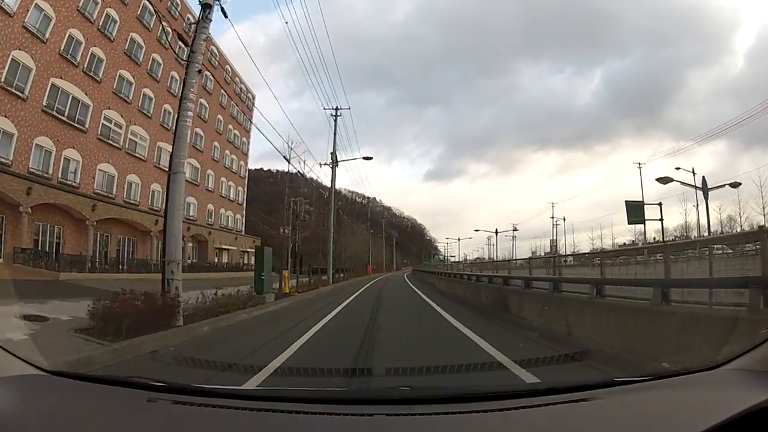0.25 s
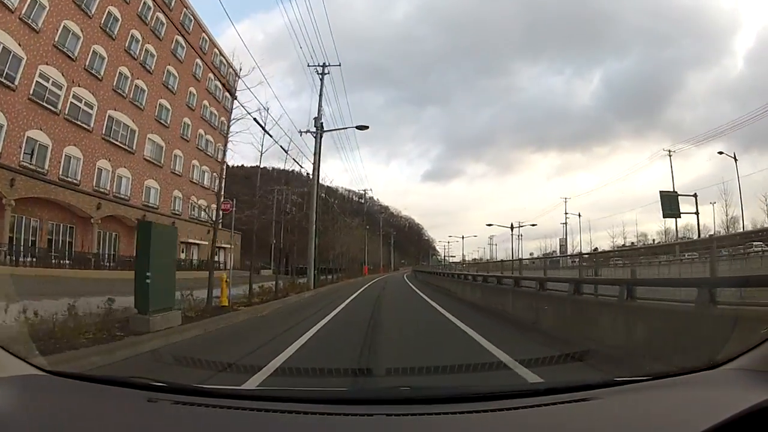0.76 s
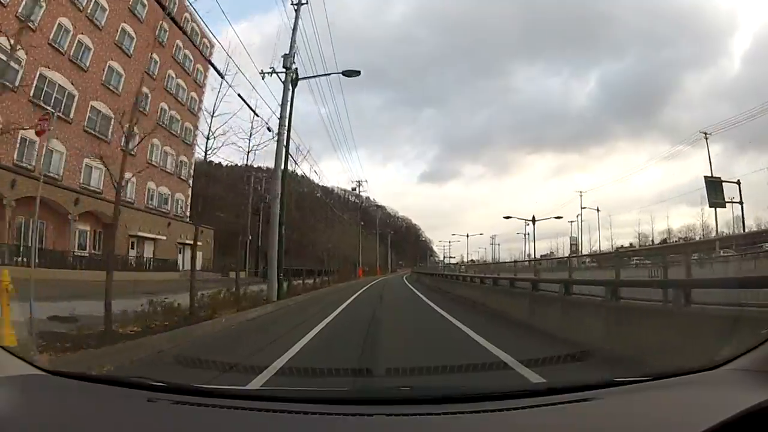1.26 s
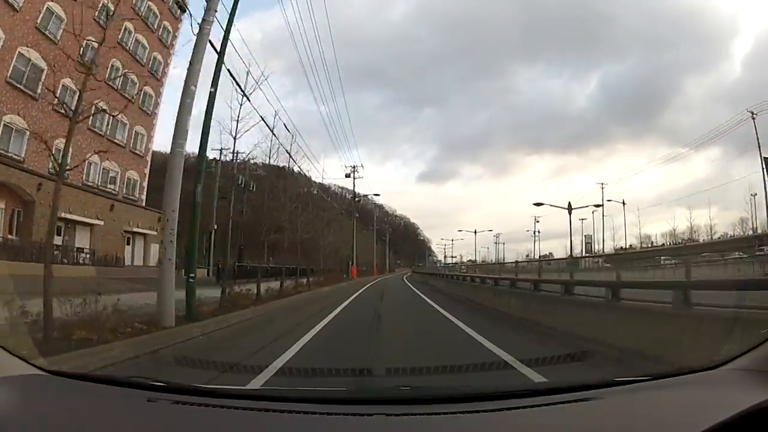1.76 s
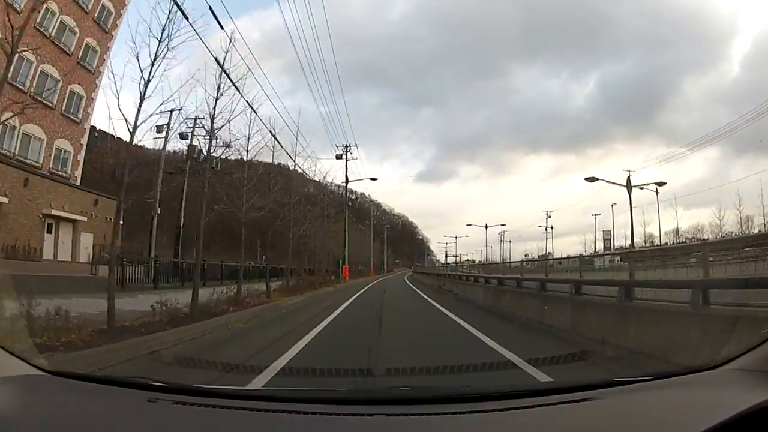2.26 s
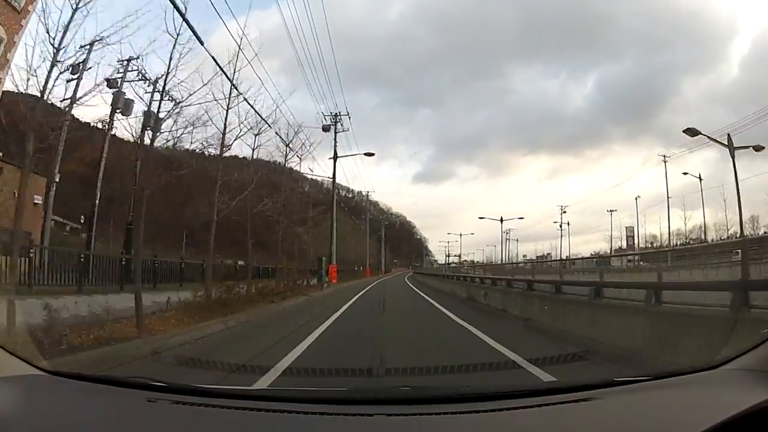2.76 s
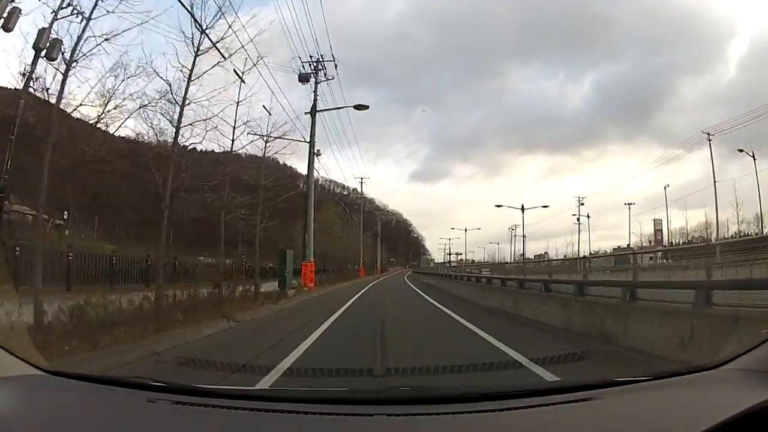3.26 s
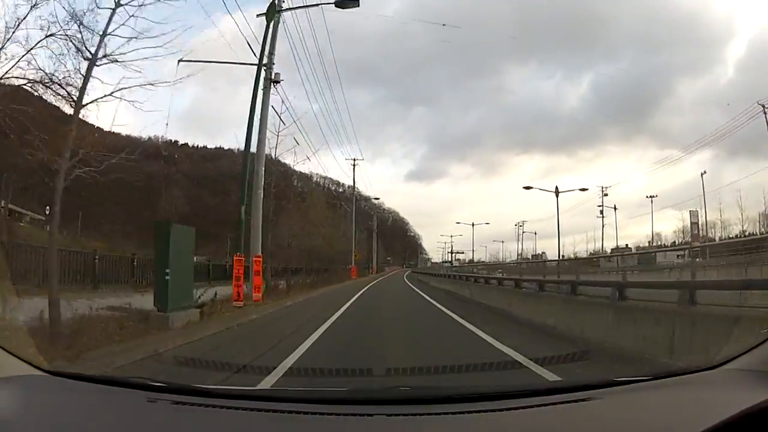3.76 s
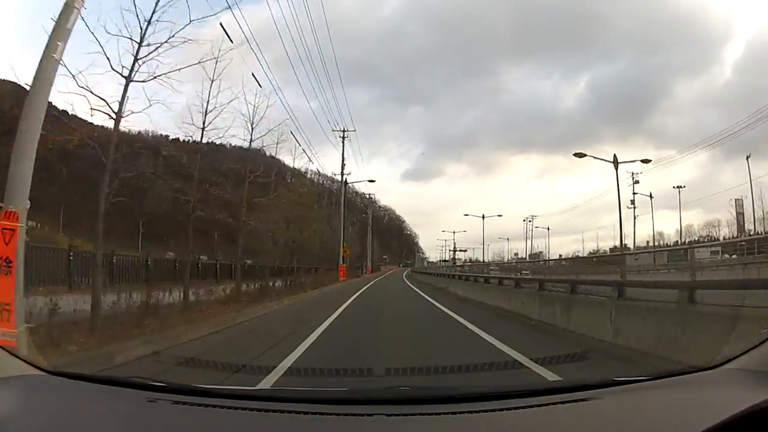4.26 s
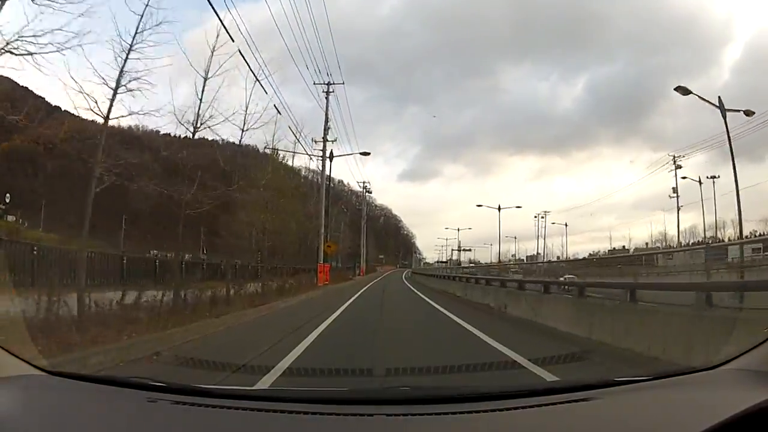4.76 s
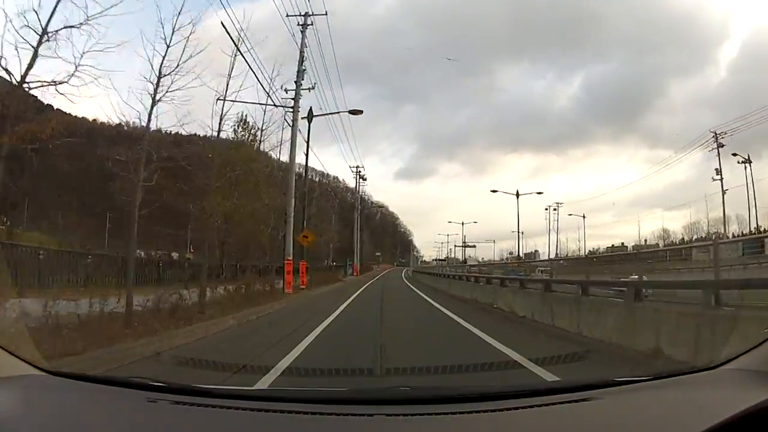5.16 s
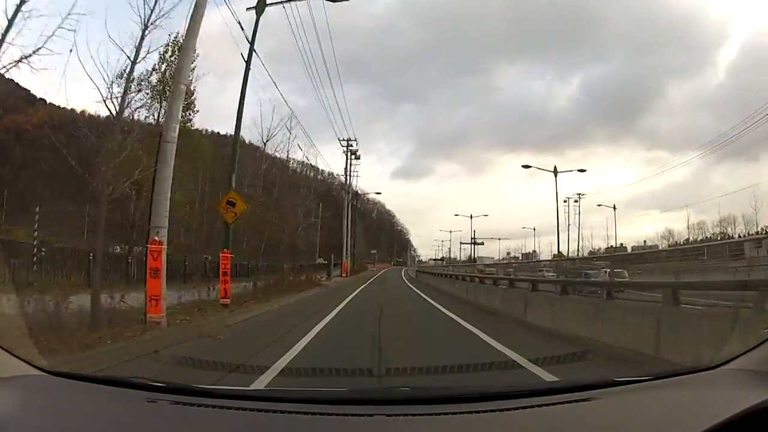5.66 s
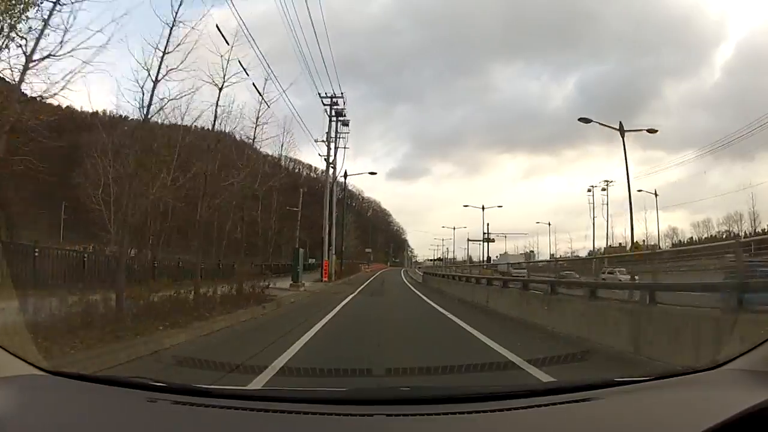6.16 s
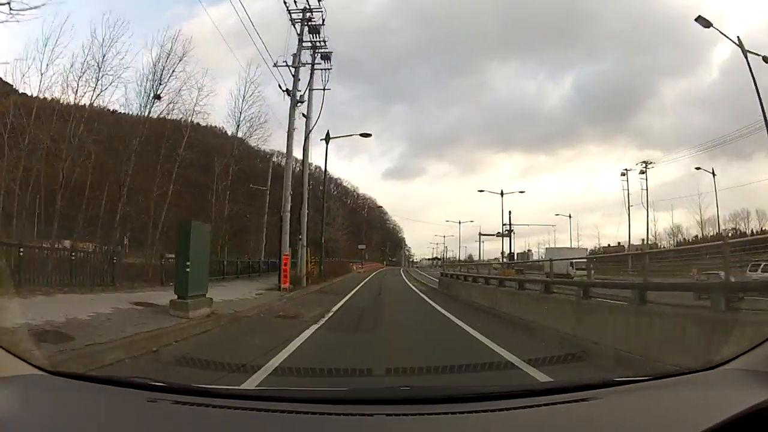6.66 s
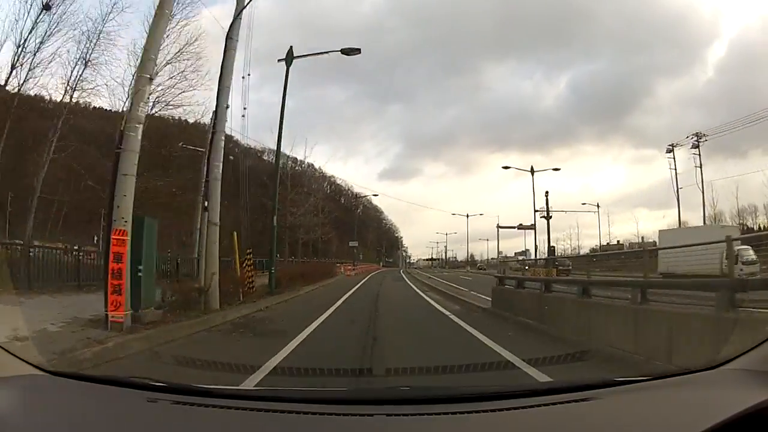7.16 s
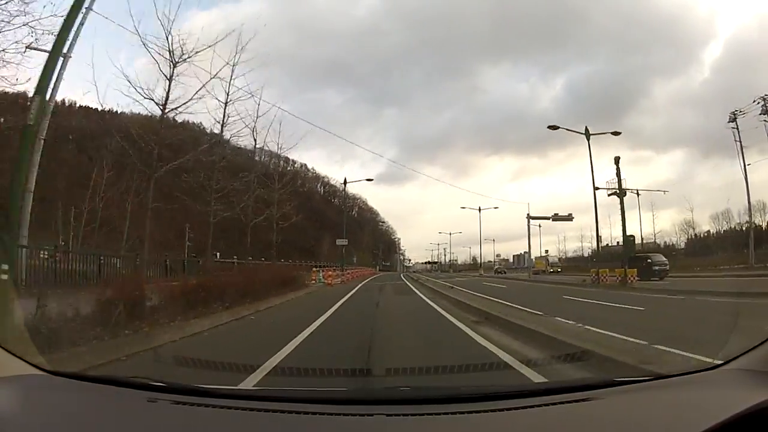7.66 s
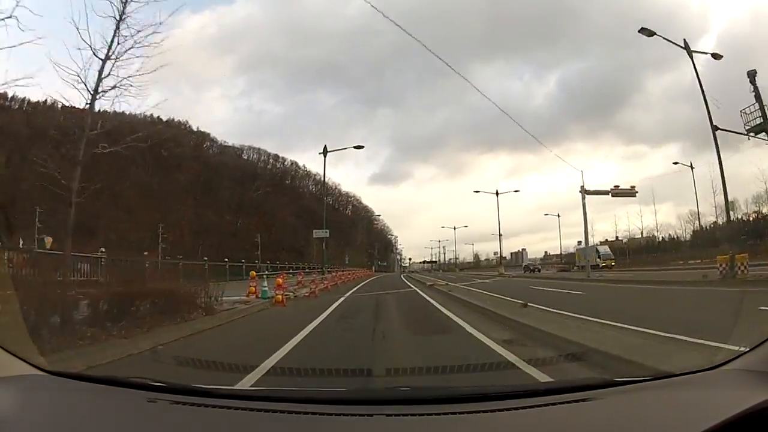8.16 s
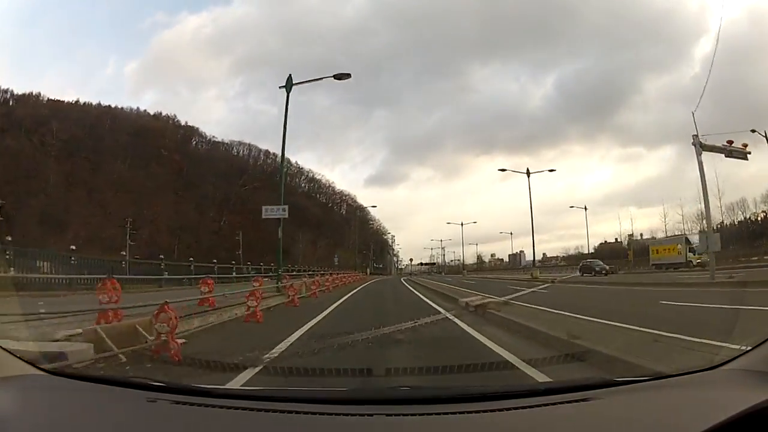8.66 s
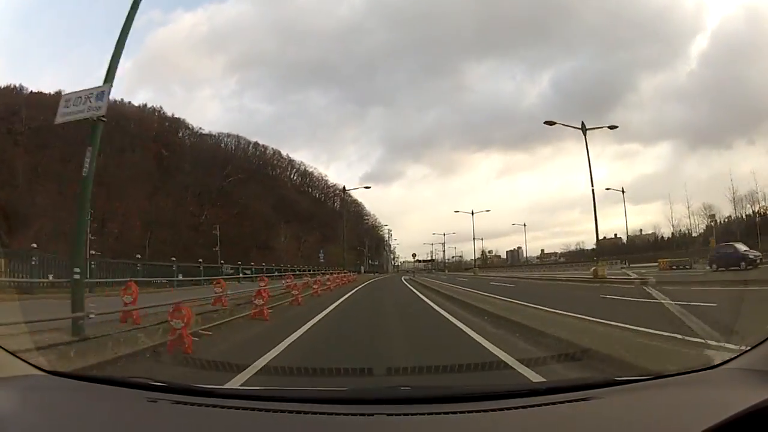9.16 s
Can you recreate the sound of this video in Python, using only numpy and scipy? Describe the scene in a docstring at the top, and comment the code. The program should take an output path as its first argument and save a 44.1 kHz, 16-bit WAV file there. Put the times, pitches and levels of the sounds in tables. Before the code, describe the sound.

Car cabin hum: a four-cylinder engine rises and settles to a drone, tyres rumble, and late rough asphalt brings thumps and plastic rattling.

```python
"""A four-cylinder engine, sines locked to its firing phase, climbs in pitch and eases into a drone inside a hybrid car.
Tyres rumble through the body as shaped noise; two damped modes boom over bumps.
Dashboard trim rattles in fits of noise fed by dense contacts, most of them on a rough stretch late on.
The dash camera's rippling sample timing adds a thin whine near 12 kHz that follows the sound."""
import sys
import numpy as np
from scipy import signal
from scipy.fft import rfft, irfft, next_fast_len
from scipy.io import wavfile
from scipy.ndimage import uniform_filter1d, map_coordinates

SR = 44100
rng = np.random.default_rng(int(sys.argv[2]) if len(sys.argv) > 2 else 0)


def unload_wav(signal):
    """Save mono or channel-first audio to the path in sys.argv[1] as 16-bit WAV at rate SR, clipped to [-1, 1]."""
    wavfile.write(
        sys.argv[1],
        SR,
        np.round(np.clip(np.atleast_2d(signal).T, -1, 1) * 32767).astype(np.int16),
    )


N = 414981

# engine speed before waver: time_s, firing_hz
FIRING_CURVE = [(0, 103.2), (.3, 101.3), (.75, 104.5), (1.25, 111.7), (1.5, 112.6), (2.03, 113.4),
                (2.55, 117.3), (3.2, 120.9), (4.0, 122.2), (4.4, 125), (4.85, 126.2), (5.5, 123.5),
                (6.6, 118), (7.2, 120.8), (7.72, 122), (8.1, 116.7), (8.6, 115.9), (9.41, 115)]
# how hard the engine pulls: time_s, load_db
LOAD_CURVE = [(0, -3), (.8, -4.5), (1.9, -1), (3.3, -2.25), (4.7, 1.1), (6.3, 0.17), (7.6, 0.5),
              (8.1, -0.9), (9.41, -1.5)]
# cabin response to firing harmonics 1 to 4, before load and waver; a list each: line_hz, level_db
CABIN_RESPONSES = [
    [(103, -25.5), (113, -27), (116, -33), (119, -31), (122, -27.5), (126, -24.5)],
    [(205, -33), (210, -30), (216, -19.5), (226, -23), (237, -24), (244, -25.5), (252, -28)],
    [(309, -27), (315, -29), (324, -23.5), (335, -37), (340, -46.5), (345, -30.5), (365, -27), (372, -24.5),
     (378, -23.5)],
    [(416, -33), (436, -36), (453, -49), (468, -40), (504, -37.5)],
]
# load followed by each of those harmonics: share [dB per dB]
HARMONIC_LOAD_SHARES = [.1, 0.31, 1.4, .3]
# weak lines from unequal cylinders, before load, waver and panels: firing_multiple, level_db
GROWL_LINES = [(0.749, -43.5), (1.25, -38), (1.75, -41), (2.25, -40.5), (2.5, -38.5), (2.75, -41.5),
               (3.25, -41.5), (3.5, -44.5), (3.75, -45), (4.25, -47), (4.5, -53), (4.75, -53), (5.0, -52),
               (5.25, -52.5), (5.5, -70), (5.75, -54.5), (6.0, -62.5), (6.25, -58), (6.5, -70), (6.75, -62),
               (7.0, -62.5), (7.25, -66.5), (7.75, -63.5), (8.0, -62.5), (8.25, -66)]
# cabin panels lifting lines that pass through: centre_hz, half_width_hz, lift_db
PANEL_RESONANCES = [(342.8, 5.5, 10), (379.3, 9.8, 8.5), (432.6, 16, 7.5), (565, 11, 7.5),
                    (672, 17.6, 16.5), (769.3, 16, 14.5)]
# faint high engine lines, before load and scatter: line_hz, level_db
BUZZ_LEVELS = [(1000, -65), (1250, -84), (1600, -82.5), (1950, -73.5), (2400, -77), (3000, -77),
               (3600, -90.5)]
# engine hiss spectrum, relative: frequency_hz, density_db
HISS_SPECTRUM = [(700, -31), (1100, -4.5), (1600, -3), (1900, 0.5), (2400, -5.5), (2900, -5), (3300, -8.5),
                 (4000, -10.5), (4600, -21), (6000, -34), (8000, -20.5), (15000, -28)]
# road-shaken body spectrum, relative: frequency_hz, density_db
BOOM_SPECTRUM = [(8, -31), (17, -16), (25, 4.5), (46, 3), (62, 1), (75, -10.5), (180, -120)]
# tyre spectrum, relative: frequency_hz, density_db
RUMBLE_SPECTRUM = [(55, -21.5), (76, -5), (88, 1), (101, 0.5), (120, -2), (144, -1.5), (173, -8.5),
                   (210, -3.5), (260, -5.5), (300, -17.5), (700, -120)]
# tread spectrum, relative: frequency_hz, density_db
ROAR_SPECTRUM = [(200, -48.5), (285, 1), (340, 0), (420, -6), (500, -7), (590, -5), (635, -12.5), (668, -6),
                 (700, -8.5), (820, -20), (920, -20), (1150, -33), (2600, -120)]
# trim spectrum, relative: frequency_hz, density_db
RATTLE_SPECTRUM = [(800, -26), (1400, 3.5), (2800, 0.5), (4000, -1.5), (5000, -7.5), (6000, -16),
                   (7500, -15), (12000, -29.5)]
# asphalt coarseness: time_s, coarseness_db
SURFACE_CURVE = [(0, -1.5), (1.0, -1), (1.8, 0.5), (2.6, -1.5), (4.0, -0.5), (5.85, -0.5), (6.3, 2.5),
                 (7.0, 0), (7.4, 6.5), (8.05, 0.5), (8.45, .5), (8.75, 7.5), (9.41, 9.5)]
# level laws: start_db (before the surface), rise_db_per_s, surface_share [dB per dB]
HISS_LEVEL_LAW = (-57.5, 0.46, 0.26)
BOOM_LEVEL_LAW = (-26.5, .05, 1.1)
RUMBLE_LEVEL_LAW = (-27.5, 0.12, 1.0)
ROAR_LEVEL_LAW = (-36, 0.61, 0.45)
# chatter fits in loose trim: start_s, hold_s (from the start, attack included), level_db
CHATTER_FITS = [(0, .24, -59), (1.165, 0.22, -69), (7.354, 0.11, -68.5), (7.862, .1, -65),
                (8.15, .02, -64.5), (8.673, .06, -64.5), (8.936, 0.33, -60), (9.233, 0.19, -54.5)]
# dashboard ticks, before TICK_TRIM_DB: start_s, level_db
TICK_EVENTS = [(1.179, -54), (2.61, -51), (3.21, -50.5), (8.18, -47.5), (8.988, -42.5), (9.048, -37),
               (9.255, -42), (9.262, -37), (9.295, -40.5), (9.308, -46.5), (9.362, -39.5)]
# road bumps, before BUMP_TRIM_DB: start_s, body_boom_db, cabin_air_db
BUMP_EVENTS = [(0.002, -15, -17.5), (6.062, -22.5, -18), (6.15, -16, -23), (7.11, -27, -13.5),
               (7.301, -19, -13), (7.434, -25.5, -20.5), (7.496, -13.5, -29), (7.821, -26, -17),
               (8.708, -15, -16.5), (8.823, -24.5, -12), (8.99, -20, -23), (9.165, -16, -16),
               (9.248, -12.5, -22)]
# modes a bump rings, body boom then cabin air, before detuning: mode_hz, t60_s
BUMP_MODES = [(37, 0.69), (138, 0.27)]

JOSTLE_DB_PER_DB = 0.16  # extra line waver per dB of coarse asphalt
CHATTER_ATTACK_S, CHATTER_RELEASE_S = 0.0067, 0.11
CONTACTS_PER_S, CONTACT_T60_S = 2000, 0.012
TICK_TRIM_DB, BUMP_TRIM_DB = -7.5, 4.5
RIPPLE_HZ, RIPPLE_DB, SLOPE_TOP_HZ, TOP_HZ = 12000, 7.0, 5500, 15290


def amp(db):
    """Decibels to gain."""
    return 10 ** (np.asarray(db) / 20)


def unit(x):
    """Scale to rms 1."""
    return x / np.sqrt(np.mean(x ** 2) + 1e-20)


def along(points, hz):
    """Read (Hz, value) points on a log axis."""
    point_hz, values = np.transpose(points)
    return np.interp(np.log(hz + 1), np.log(point_hz), values)


def curves(rows):
    """One value per sample for each column after the time."""
    time_s, *columns = np.transpose(rows)
    return [np.interp(np.arange(N) / SR, time_s, column) for column in columns]


def wobble(knots_per_s):
    """Smooth random curve."""
    knots = rng.standard_normal(1024)
    positions = np.linspace(0, knots_per_s * N / SR, 4096)
    coarse = map_coordinates(knots, [positions], mode="wrap")
    return np.interp(np.linspace(0, 1, N), np.linspace(0, 1, len(coarse)), coarse)


def filtered(x, response):
    """Apply a response of frequency."""
    size = next_fast_len(N + SR // 4, True)
    spectrum = rfft(x, size) * response(np.fft.rfftfreq(size, 1 / SR))
    return irfft(spectrum, size)[:N]


def coloured(x, spectrum):
    """Shape x by a spectrum, at rms 1."""
    return unit(filtered(x, lambda hz: amp(along(spectrum, hz))))


def noise(spectrum):
    """Coloured noise of rms 1."""
    return coloured(rng.standard_normal(N), spectrum)


def even(x, window_s):
    """Divide noise by its local rms to smooth away slow chance swells."""
    size = int(window_s * SR)
    power = uniform_filter1d(uniform_filter1d(x * x, size), size)
    return x / np.sqrt(np.abs(power) + 1e-9)


def line(phase, multiple):
    """Sine of rms 1 locked to the firing phase (in cycles)."""
    turns = (multiple * phase + rng.random()) % 1
    return np.sqrt(2) * np.sin((2 * np.pi * turns).astype(np.float32))


def road_db(law):
    """Noise level growing with the car's speed (as a steady rise in time) and asphalt coarseness."""
    start_db, rise_db_per_s, surface_share = law
    surface_db, = curves(SURFACE_CURVE)
    return start_db + rise_db_per_s * np.arange(N) / SR + surface_share * surface_db


def drone(phase, firing_hz, load_db, waver_db):
    """Strong firing harmonics swell and fade as they sweep through the cabin's modes."""
    surface_db, = curves(SURFACE_CURVE)
    unsteady_db = waver_db + JOSTLE_DB_PER_DB * np.maximum(surface_db, 0)
    out = np.zeros(N)
    for k, (response, share) in enumerate(zip(CABIN_RESPONSES, HARMONIC_LOAD_SHARES), 1):
        level_db = along(response, k * firing_hz) + share * load_db + unsteady_db * wobble(7)
        out += amp(level_db) * line(phase, k)
    return out


def growl(phase, firing_hz, waver_db):
    """Weaker lines swell as they cross panel resonances."""
    grid_hz = np.arange(SR // 32)
    lift_db = sum(db / (1 + ((grid_hz - hz) / half_width_hz) ** 2)
                  for hz, half_width_hz, db in PANEL_RESONANCES)
    out = np.zeros(N)
    for k, db in GROWL_LINES:
        lift = np.interp(k * firing_hz, grid_hz, amp(lift_db))
        out += amp(db + waver_db * wobble(4)) * lift * line(phase, k)
    return out


def buzz(phase, firing_hz, scatter_db):
    """High multiples of the engine cycle, which lasts four firings."""
    multiples = np.arange(37, 112) / 4
    speeds_hz = np.linspace(firing_hz.min(), firing_hz.max(), num=8)
    out = np.zeros(N)
    for k in multiples:
        # crowded cabin modes: a new strength at each speed
        level_db = along(BUZZ_LEVELS, k * speeds_hz) + scatter_db * rng.standard_normal(len(speeds_hz))
        out += np.interp(firing_hz, speeds_hz, amp(level_db)) * line(phase, k)
    return out


def engine_hiss(phase, load_db):
    """Valves and injectors pulse noise near the firing rate and at 1/4 and 3/4 of it."""
    per_cycle = 1 / 4
    pulses = 1 + 0.076 * line(phase, 0.96)
    pulses += 0.1 * line(phase, per_cycle)
    pulses += 0.08 * line(phase, 1 - per_cycle)
    level = amp(road_db(HISS_LEVEL_LAW) + 0.25 * load_db)
    return level * unit(pulses) * noise(HISS_SPECTRUM)


def engine():
    """One crankshaft phase turns drone, growl, buzz and hiss, all louder under load."""
    firing_hz, = curves(FIRING_CURVE)
    load_db, = curves(LOAD_CURVE)
    phase = np.cumsum(firing_hz * (1 + 0.00094 * wobble(14))) / SR
    low = drone(phase, firing_hz, load_db, waver_db=1.02)
    middle = amp(load_db) * growl(phase, firing_hz, waver_db=2.0)
    high = amp(1.6 * load_db - 2.5) * buzz(phase, firing_hz, scatter_db=5.0)
    return low + middle + high + engine_hiss(phase, load_db)


def road():
    """The surface shakes body (boom), tyres (rumble) and tread (roar) as shaped noise."""
    boom = amp(road_db(BOOM_LEVEL_LAW)) * even(noise(BOOM_SPECTRUM), window_s=0.45)
    rumble = amp(road_db(RUMBLE_LEVEL_LAW)) * even(noise(RUMBLE_SPECTRUM), window_s=0.11)
    roar = amp(road_db(ROAR_LEVEL_LAW)) * noise(ROAR_SPECTRUM)
    return boom + rumble + roar


def chatter():
    """Trim chatter strength: each fit rises, holds and dies away."""
    t = np.arange(N) / SR
    strength = np.zeros(N)
    for start_s, hold_s, db in CHATTER_FITS:
        attack = np.clip((t - start_s) / CHATTER_ATTACK_S, 0, 1)
        release = np.exp(-np.maximum(t - start_s - hold_s, 0) / CHATTER_RELEASE_S)
        strength += amp(db) * attack * release
    return strength


def trim(tick_t60_s):
    """Plastic parts chatter in dense tiny decaying contacts and now and then tick."""
    t = np.arange(SR // 8) / SR
    contacts = (rng.random(N) < CONTACTS_PER_S / SR) * rng.uniform(0.2, 1, N)
    bursts = signal.fftconvolve(contacts, amp(-60 * t / CONTACT_T60_S))[:N]
    envelope = chatter() * unit(bursts)
    tick = amp(-60 * t / tick_t60_s) * (1 - np.exp(-t / 0.00035))
    for start_s, db in TICK_EVENTS:
        span = envelope[round(start_s * SR):][:len(t)]  # view: adds in place
        span += amp(db + TICK_TRIM_DB) * tick[:len(span)]
    return envelope * noise(RATTLE_SPECTRUM)


def bumps(rise_s):
    """At each bump the soft tyre swells two low body modes, which ring down."""
    t = np.arange(SR // 2) / SR
    out = np.zeros(N + SR)
    swell = 1 - np.exp(-(t / rise_s) ** 2)
    for start_s, *levels_db in BUMP_EVENTS:
        detunes = rng.normal(1, 0.036, len(BUMP_MODES))
        for (hz, t60_s), db, detune in zip(BUMP_MODES, levels_db, detunes):
            decay = amp(db + BUMP_TRIM_DB - 60 * t / t60_s)
            ring = decay * swell * np.sin(2 * np.pi * hz * detune * t)
            out[round(start_s * SR):][:len(t)] += ring
    return out[:N]


def scene():
    """Everything heard at the windscreen."""
    return (engine() + road() + trim(tick_t60_s=0.12) + bumps(rise_s=0.0062))[None]


def record(dry):
    """Camera sample-timing ripple mirrors the sound on both sides of 12 kHz; then its band limit."""
    sound = dry[0] * signal.windows.tukey(N, 0.002)
    # a small timing error adds the waveform's slope times the ripple
    slope = filtered(sound, lambda hz: 1j * hz / RIPPLE_HZ * (hz < SLOPE_TOP_HZ))
    ripple = np.cos(2 * np.pi * RIPPLE_HZ * np.arange(N) / SR)
    rippled = sound + amp(RIPPLE_DB) * slope * ripple
    return filtered(rippled, lambda hz: hz < TOP_HZ)[None]


dry = scene()
out = record(dry)
unload_wav(out)
```